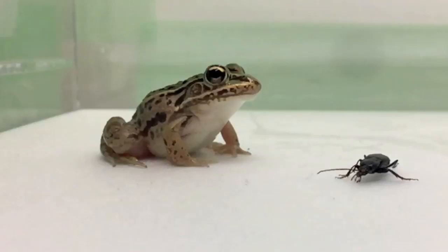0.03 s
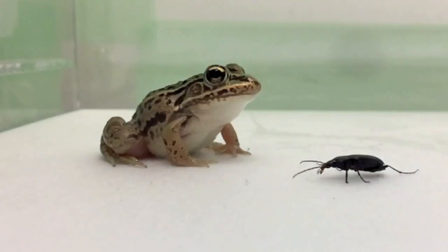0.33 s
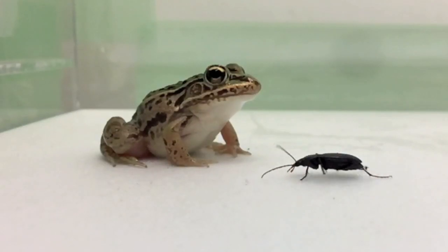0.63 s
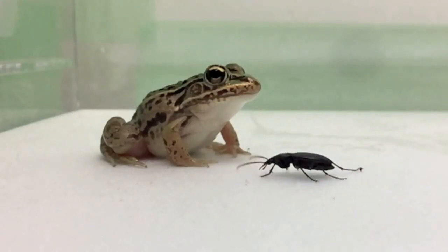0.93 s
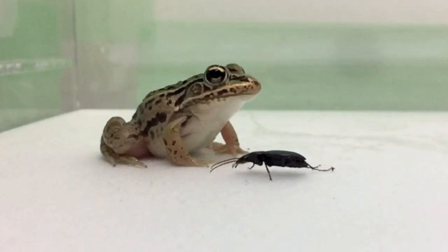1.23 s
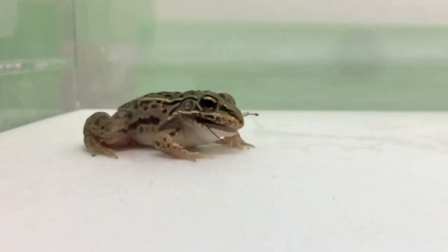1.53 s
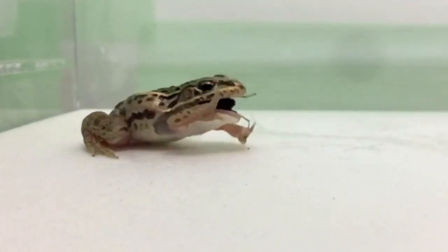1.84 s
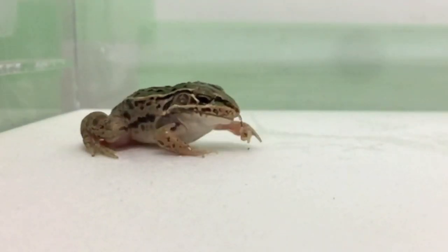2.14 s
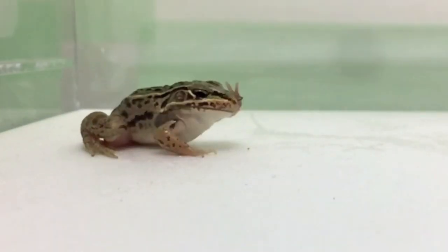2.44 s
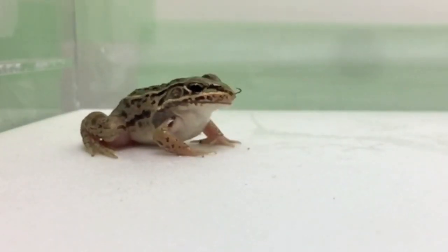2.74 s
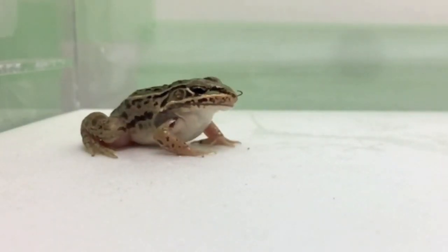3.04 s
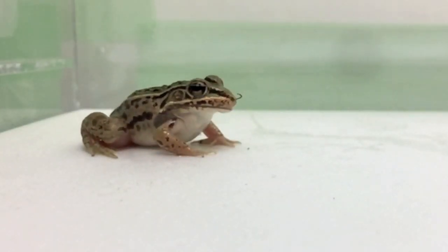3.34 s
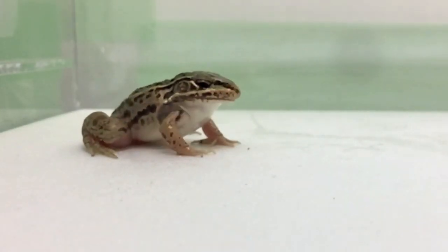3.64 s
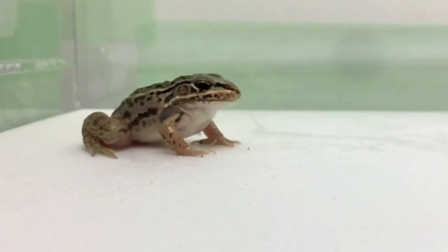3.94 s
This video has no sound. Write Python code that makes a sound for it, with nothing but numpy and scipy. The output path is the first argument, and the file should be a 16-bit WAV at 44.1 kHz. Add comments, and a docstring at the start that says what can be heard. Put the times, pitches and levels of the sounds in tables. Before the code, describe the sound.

A frog's wet smack is the main sound, heard close over a small room's steady fan hum, which fades in at the start. The smack comes at 1.4 seconds with a tiny crackle, a hollow slap on a plastic tray and a faint sliding hiss. Faint sticky ticks follow. Damp feet pat the tray at 2.3 and 2.6 seconds, and the mouth ticks softly in a gulp around 3.5 seconds.

```python
"""A small room with a fan humming, the microphone close to a plastic tray in a frog's tank.
The frog lunges at a beetle: a wet smack rings its mouth and its tongue peels off with a crackle.
Its body lands with a slap and a hollow thud, then slides. Its feet pat the tray twice more,
and its mouth ticks as it gulps. The sound fades in at the start."""
import sys
import numpy as np
from scipy import signal
from scipy.fft import rfft, irfft
from scipy.io import wavfile

SR = 44100
rng = np.random.default_rng(int(sys.argv[2]) if len(sys.argv) > 2 else 0)


def wav_out(sig):
    """Save sig, one row per channel (or a flat mono array), as 16-bit PCM at SR to the path in sys.argv[1]."""
    wavfile.write(sys.argv[1], SR, np.round(np.clip(np.atleast_2d(sig).T, -1, 1) * 32767).astype(np.int16))


N = 176400
ONSET_S = .0006  # rise time of every wet burst


def undb(db):
    """Decibels to gain."""
    return 10 ** (np.asarray(db) / 20)

def unit(x):
    """Scale to rms 1."""
    return x / np.sqrt(np.mean(x ** 2))

def ring(x, response):
    """Pass a sound through an impulse response scaled to unit power."""
    return signal.fftconvolve(x, response / np.linalg.norm(response))[:N]

def gains(points, size):
    """Gain at each frequency of a spectrum given as (Hz, dB) points."""
    hz, db = np.array(points).T
    bin_hz = np.arange(size // 2 + 1) * SR / size
    return undb(np.interp(np.log(bin_hz + 1), np.log(hz), db))

def colour(x, points):
    """Causal filter of unit power with the given spectrum."""
    cepstrum = irfft(np.log(gains(points, size=1024)))
    cepstrum[1:512] *= 2  # fold onto positive time for minimum phase
    cepstrum[513:] = 0
    return ring(x, irfft(np.exp(rfft(cepstrum))))

def band(x, hz, width_hz):
    """Band-pass of unit power."""
    edges = np.clip([hz - width_hz / 2, hz + width_hz / 2], 20, SR / 2 - 1)
    bandpass = signal.butter(2, edges, "band", fs=SR, output="sos")
    return signal.sosfilt(bandpass, x) * np.sqrt(SR / 2 / width_hz)

def drift(rate_hz):
    """Smooth random wandering of rms 1."""
    hz = np.arange(N // 2 + 1) * SR / N
    return unit(irfft(rfft(rng.standard_normal(N)) / (1 + (hz / rate_hz) ** 2), N))

def since(start):
    """Seconds since a moment, zero before it."""
    return np.maximum(np.arange(N) / SR - start, 0)

def burst(start, length):
    """Envelope that rises fast, holds briefly and dies away."""
    age = since(start)
    return (1 - np.exp(-age / ONSET_S)) * np.exp(-(age / length) ** 2 / 2)

def struck(start, modes):
    """Damped modes set ringing at one moment, in alternating polarity, each slightly detuned."""
    age = since(start)[:SR // 2 + int(start * SR)]
    out = np.zeros(N)
    for k, (hz, db, t60) in enumerate(modes):
        detuned_hz = hz * (1 + .01 * rng.standard_normal())
        out[:len(age)] += (-1) ** k * undb(db - 60 * age / t60) * np.sin(2 * np.pi * detuned_hz * age)
    return out

def grains(per_s=7000, spread_db=2):
    """Tiny random clicks of a wet film parting."""
    hits = rng.random(N) < per_s / SR
    return unit(hits * rng.choice([-1, 1], N) * undb(spread_db * rng.standard_normal(N)))


# The fan's air, behind everything. Each row: frequency in Hz, relative spectral level in dB.
AIR_SPECTRUM = [(25, -42), (38, -29), (60, -18.5), (80, -19.5), (122, -15.5), (142, -16.5), (176, -6),
                (205, -9), (260, -16), (370, -13.5), (490, -22.5), (610, -20.5), (800, -21.5), (950, -24.5),
                (1230, -30.5), (1600, -30), (2100, -34.5), (2800, -42.5), (4500, -53), (6000, -54),
                (8500, -57.5), (9500, -55), (10300, -65), (11600, -58), (15000, -62.5)]
# Resonances of its housing. Each row: centre in Hz, width in Hz, rms level in dB.
HOUSING_BANDS = [(119.6, 10, -58), (334.8, 18, -65.5), (771, 24, -70.5), (828, 31, -71), (939, 48, -66.5),
                 (1075, 32, -71), (1356, 33, -72), (1536, 49, -71.5), (1963, 88, -71), (2249, 30, -74.5),
                 (9520, 160, -93)]
# Fan and motor tones. Each row: pitch in Hz, rms level in dB, unsteadiness as a share of the tone.
FAN_TONES = [(97.3, -49, 0.15), (213.6, -43.7, 0.32), (236.4, -53.5, 0.51), (360, -59, 0.61),
             (402, -55.5, 0.32), (590.4, -63, 0.65), (704.6, -61.5, 0.61), (882.5, -56.5, 0.28)]

def fan(air_db=-46.5, waver_hz=9.7, sag_db_per_s=.8):
    """A dull rush of air stirs the housing, under wavering tones that slowly ease off."""
    t = np.arange(N) / SR
    air = irfft(rfft(rng.standard_normal(N)) * gains(AIR_SPECTRUM, size=N), N)
    out = undb(air_db) * unit(air)
    for hz, width, db in HOUSING_BANDS:
        out += undb(db) * band(rng.standard_normal(N), hz, width)
    sag = undb(-sag_db_per_s * t)
    for hz, db, unsteady in FAN_TONES:
        waver = 1 + unsteady * (drift(waver_hz) + 1j * drift(waver_hz))  # in level and phase
        tone = np.exp(2j * np.pi * (hz * t + rng.random()))
        out += undb(db) * unit(np.real(sag * waver * tone))
    return out


# The frog's mouth, close up. Each row: pitch in Hz, relative level in dB, t60 in seconds.
MOUTH_MODES = [(760, -17, .025), (1100, -11.5, 0.022), (1595, -.5, .02), (2520, -22, 0.014),
               (3620, -14.5, 0.015), (4310, -15, 0.011), (5280, -15, 0.013), (6100, -20, 0.011),
               (7330, -17, 0.011), (8500, -14, .012)]
# Tugs of the tongue. Each row: start in seconds, level in dB, length in seconds.
TONGUE_PEELS = [(1.4034, -45, 0.0014), (1.4051, -34, 0.0024), (1.41, -45, 0.0035)]
# The colour of wet skin slapping. Each row: frequency in Hz, relative level in dB.
SKIN_SPECTRUM = [(300, -11), (1000, -3.5), (2500, 2.5), (3800, -2.5), (5500, -1.5), (8500, -4.5),
                 (10500, -11), (12500, -13), (15000, -22)]

def strike(start_s=1.4046, rise_s=.0009, mouth_db=-16.8):
    """The jaws close with one smack that rings the mouth while the tongue peels off in quick tugs."""
    mouth = struck(start_s, MOUTH_MODES) * (1 - np.exp(-since(start_s) / rise_s))
    peel = sum(undb(db) * burst(start, length) for start, db, length in TONGUE_PEELS)
    return undb(mouth_db) * mouth + colour(peel * grains(), SKIN_SPECTRUM)


# Body and feet slide on the tray. Each row: start, peak and end in seconds, peak level in dB.
SKIN_DRAGS = [(1.41, 1.47, 1.654, -65.5), (1.475, 1.502, 1.53, -56), (1.96, 1.992, 2.05, -71)]
# The colour of their hiss. Each row: frequency in Hz, relative level in dB.
DRAG_SPECTRUM = [(1000, -9), (3000, -4), (5800, 3.5), (8500, -2.5), (10500, -4), (15000, -10)]

def slide():
    """Damp skin drags over the plastic with a swelling, grainy hiss."""
    t = np.arange(N) / SR
    push = sum(undb(db) * np.interp(t, [start, peak, end], [0, 1, 0])
               for start, peak, end, db in SKIN_DRAGS)
    return colour(push * grains(per_s=2200), DRAG_SPECTRUM)


# Mouth and toes, faint even this near the microphone.
# Each row: start in seconds, middle band level in dB, top band level in dB, length in seconds.
WET_TICKS = [(1.4134, -46, -62, .0015), (1.4245, -54, -66, .0012), (1.438, -61, -68, 0.003),
             (1.79, -58.5, -72, 0.0032), (1.809, -63, -81, 0.0035), (1.928, -65, -53, .003),
             (1.944, -68, -85, 0.012), (2.271, -48, -64, .0013), (2.590, -74, -67, .002),
             (2.6288, -57, -66, 0.0016), (3.543, -58, -55.5, 0.0025), (3.546, -45, -52, 0.0013),
             (3.5494, -50.5, -55, .0018), (3.564, -68, -63, 0.002)]

def ticks(hollow_db=-7, crackle_db=-21, crackle_s=.014):
    """Small sticky clicks, each with a hollow under it and a trailing crackle of parting slime."""
    middle = sum(undb(db) * burst(start, length) for start, db, _, length in WET_TICKS)
    top = sum(undb(db) * burst(start, length) for start, _, db, length in WET_TICKS)
    trail = sum(undb(db + crackle_db) * burst(start, crackle_s) for start, _, db, _ in WET_TICKS)
    crackle = trail * grains(per_s=500)
    hollow = undb(hollow_db) * band(middle * grains(), hz=1900, width_hz=600)
    click = band(middle * grains(), hz=5900, width_hz=3200)
    fizz = band(top * grains() + crackle, hz=12600, width_hz=4600)
    return hollow + click + fizz


# Wet skin meets the tray. Each row: start and length in seconds, splash level in dB, the large air
# pocket's pitch in Hz and level in dB, the same for the small one, its width as a share of its pitch.
SKIN_SLAPS = [(1.4149, .0017, -34, 3100, -33, 7100, -35.5, .3),
              (2.2707, .0016, -44.5, 2680, -36, 8200, -40, .45),
              (2.6324, .0018, -36, 4250, -39, 5200, -39, .8)]

def slaps(pocket_t60_s=.013):
    """Wet skin splashes and squeezes two air pockets: the large one pops, the small one fizzes."""
    out = np.zeros(N)
    for start, length, splash_db, large_hz, large_db, small_hz, small_db, width in SKIN_SLAPS:
        touch = burst(start, length)
        out += undb(splash_db) * colour(touch * grains(), SKIN_SPECTRUM)
        out += struck(start + ONSET_S, [(large_hz, large_db, pocket_t60_s)])
        out += undb(small_db) * band(touch * grains(), small_hz, small_hz * width)
    return out


# The plastic tray, close up. Each row: pitch in Hz, relative level in dB, t60 in seconds.
TRAY_MODES = [(226, -11, .13), (340, -13, .08), (464, -13.5, .05), (585, -11, .06), (755, -2.5, .055),
              (857, -8.5, .04), (1010, -6.5, .05), (1110, -12, .035), (1490, -14, .04), (1860, -21, .03),
              (2380, -16, .036), (2640, -16, 0.03)]
# The body lands, then the feet. Each row: start in seconds, gain in dB, contact time in seconds,
# share of the ring time left, tilt in dB per octave, the main mode's extra gain at this spot in dB.
TRAY_BLOWS = [(1.4152, -26, 0.0003, 1.0, -1, 1.5), (2.2716, -23.5, 0.0005, .7, -4, -5),
              (2.6336, -25, 0.0006, 0.33, -2.8, -2)]

def pats():
    """The tray answers each soft blow with a short hollow thud, damped by the skin that rests on it."""
    out = np.zeros(N)
    main_hz = TRAY_MODES[4][0]  # the strongest mode
    for start, db, contact_s, ring_share, tilt_db, main_db in TRAY_BLOWS:
        modes = []
        for hz, mode_db, t60 in TRAY_MODES:
            level_db = mode_db + tilt_db * np.log2(hz / main_hz) + main_db * (hz == main_hz)
            modes.append((hz, level_db, t60 * ring_share))
        rise = 1 - np.exp(-since(start) / contact_s)
        out += undb(db) * struck(start, modes) * rise
    return out


def echoes(x, t60_s, db):
    """Diffuse reflections that die away."""
    decay = np.exp(-np.log(1000) * np.arange(SR) / SR / t60_s)
    return undb(db) * ring(x, rng.standard_normal(SR) * decay)

def scene():
    """One microphone hears the frog, its echoes off the tank's walls and the room, and the fan."""
    frog = strike() + pats() + slaps() + ticks() + slide()
    tank = echoes(frog, t60_s=.05, db=-11)
    room = echoes(frog, t60_s=.7, db=-17.8)
    return (frog + tank + room + fan())[None]


# The microphone's level comes up. Each row: time in seconds, gain in dB.
FADE_POINTS = [(.075, -70), (0.092, -20), (.12, -11.5), (.145, -4.5), (.17, -1)]

def record(dry, top_hz=15300):
    """The recorder fades in and cuts the top."""
    t = np.arange(N) / SR
    times, db = np.array(FADE_POINTS).T
    fade = undb(np.interp(t, times, db)) * (t > times[0])
    lowpass = signal.ellip(12, .2, 80, top_hz, fs=SR, output="sos")
    return signal.sosfilt(lowpass, dry * fade)


dry = scene()
out = record(dry)
wav_out(out)
```